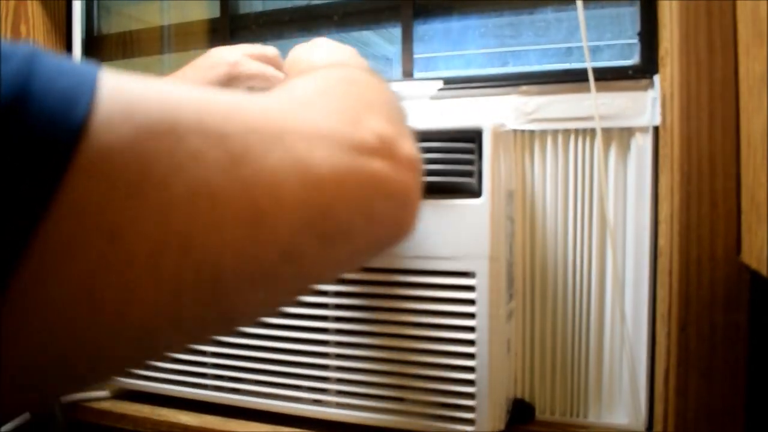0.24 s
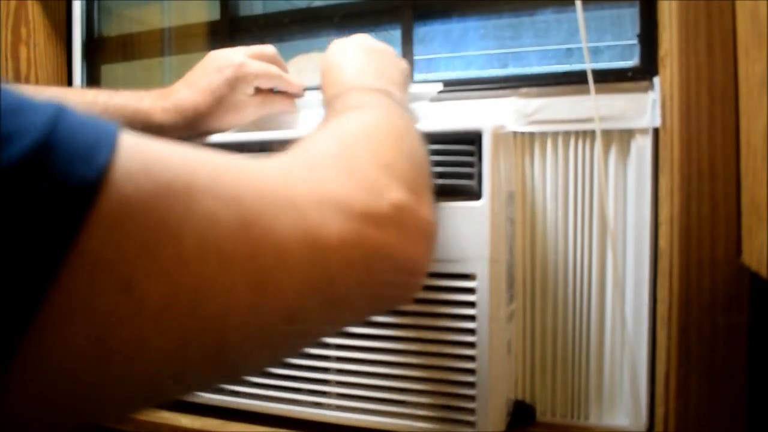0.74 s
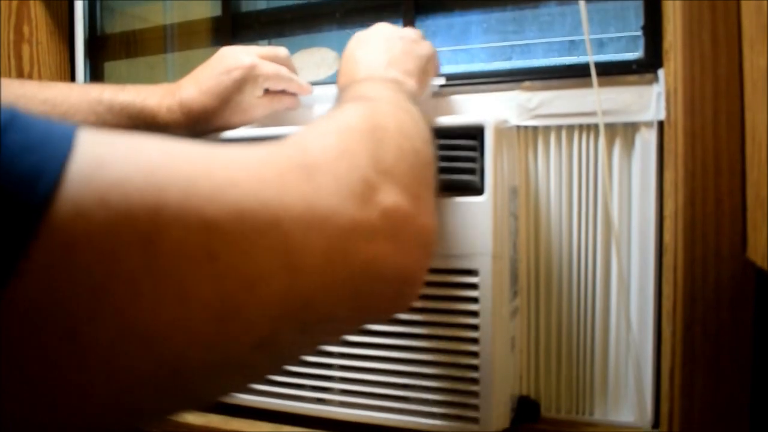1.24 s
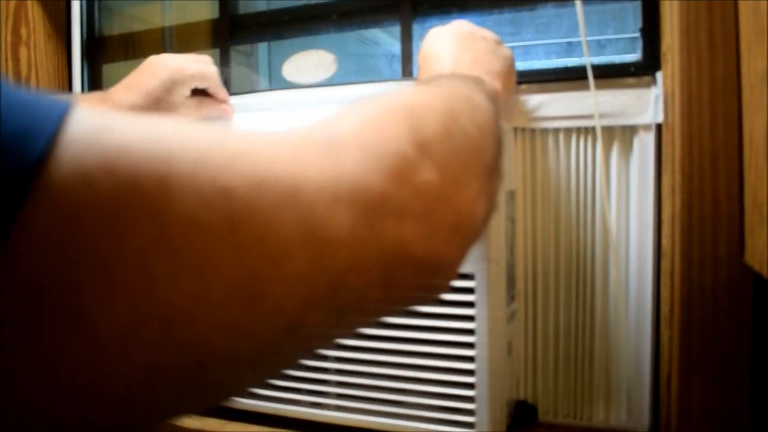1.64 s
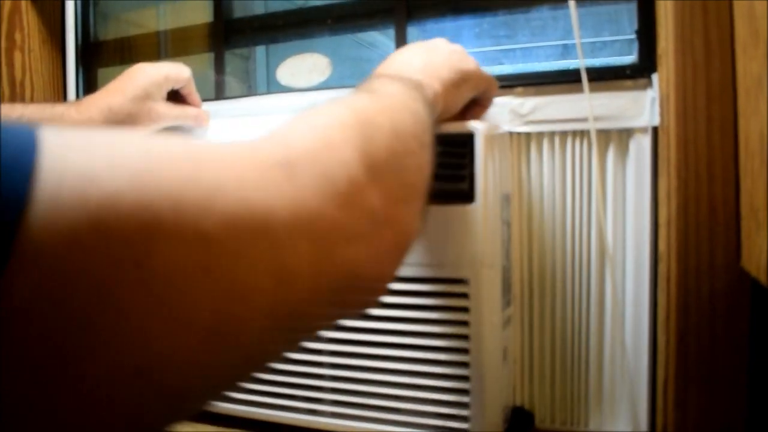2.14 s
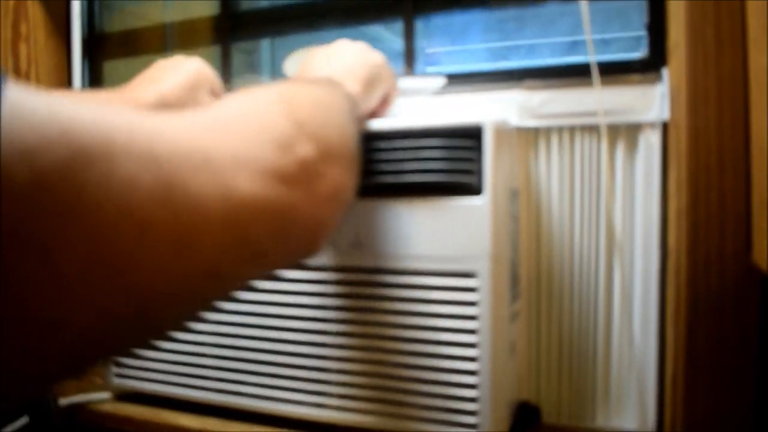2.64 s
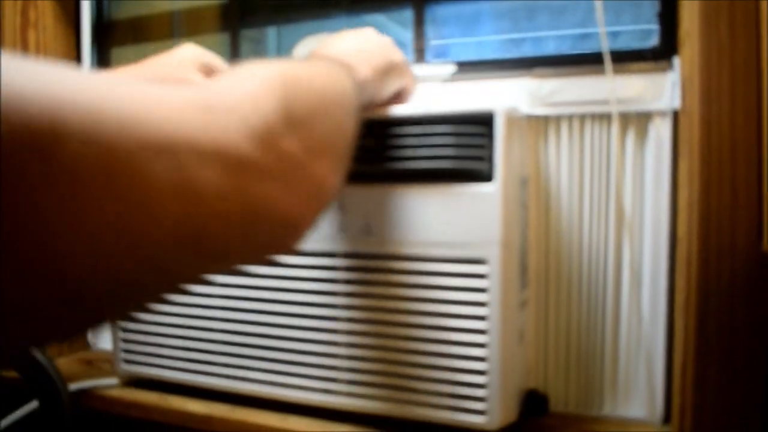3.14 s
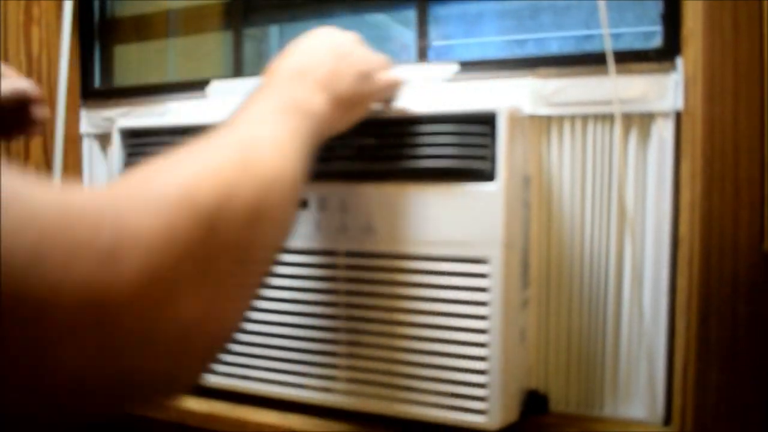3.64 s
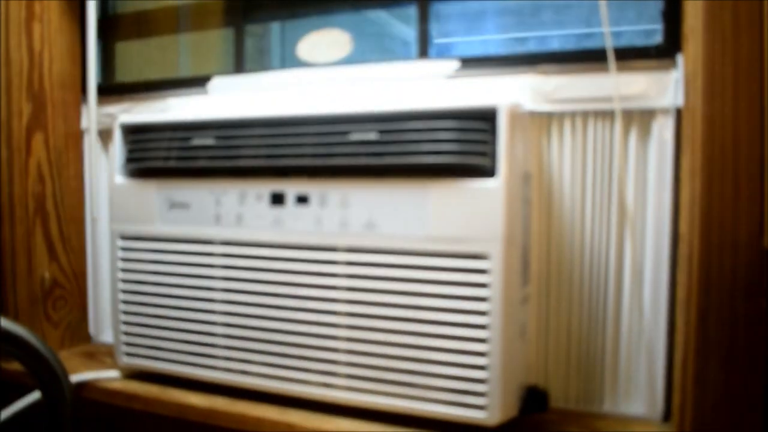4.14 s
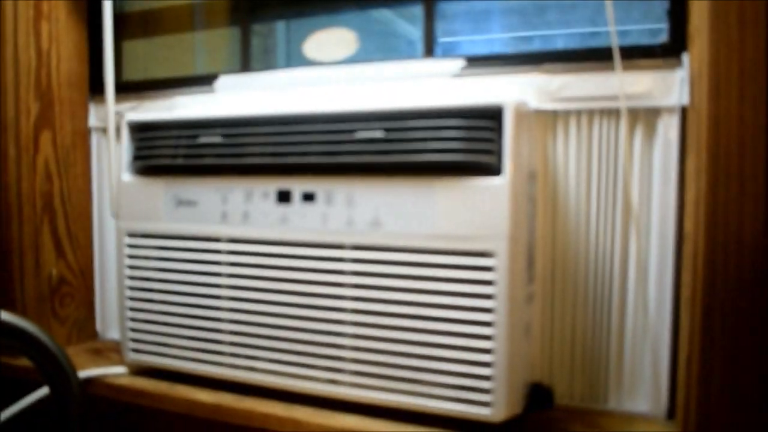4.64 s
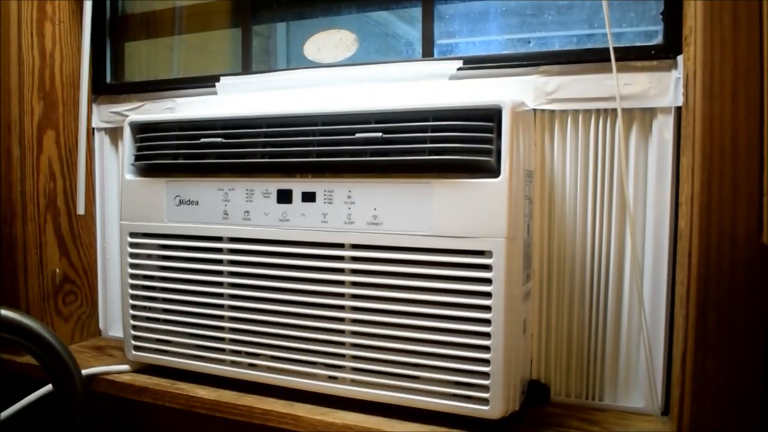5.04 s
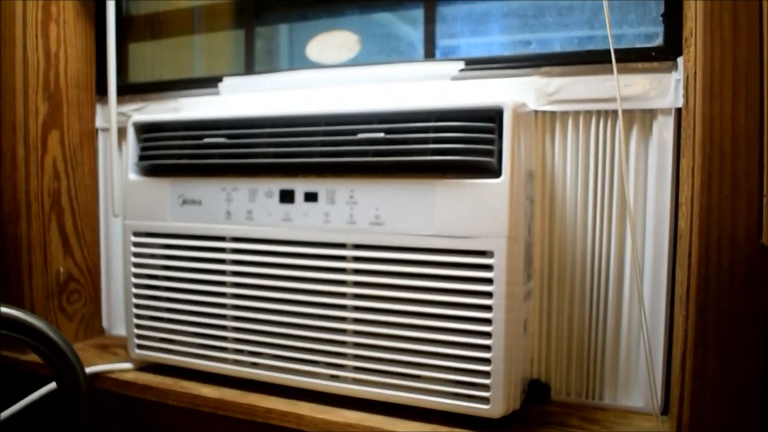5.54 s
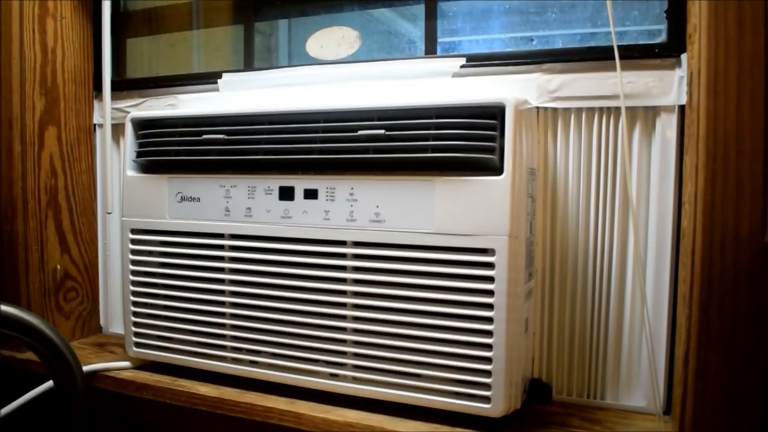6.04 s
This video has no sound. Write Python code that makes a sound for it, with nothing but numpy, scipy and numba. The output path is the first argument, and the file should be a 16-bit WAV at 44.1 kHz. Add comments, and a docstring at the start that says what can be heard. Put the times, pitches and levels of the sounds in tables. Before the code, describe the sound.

Fingers smooth tape along a window air conditioner, making soft hissing rubs mixed with hollow plastic knocks and dull thuds. A few light taps ping the window frame as the handling thins out. Then come a short peel, a snap, and a loud, jerky rip of duct tape off the roll, right by the microphone and slightly overloaded. A faint appliance hum fills the small room.

```python
"""Duct tape rips off the roll, close and loud enough to overload, in a small panelled room.
The glue lets go in stick-slip jerks: bursts of snapping threads ring the roll and the taut strip,
whose pitch dives as it lengthens. Leading up to the rip, fingers rub tape down along a window air
conditioner and knock on its plastic casing; then come a short peel and a snap.
Room air and a faint appliance hum lie underneath."""
import sys
import numpy as np
from scipy import signal
from scipy.fft import rfft, irfft
from scipy.io import wavfile
from numba import njit

SR = 44100
rng = np.random.default_rng(int(sys.argv[2]) if len(sys.argv) > 2 else 0)


def wrap_up_sound(samples):
    """Save the sound to the file named by the first command line argument, as 16-bit audio."""
    columns = np.atleast_2d(samples).T
    # keep every value between -1 and 1, then stretch to whole-number steps
    tamed = np.clip(columns, -1, 1)
    steps = np.round(tamed * 32767).astype(np.int16)
    wavfile.write(sys.argv[1], SR, steps)


N = 276948
T = np.arange(N) / SR

# jerks of the glue letting go, one long free run in the middle: (time [s], length [s], level [dB])
GLUE_SLIPS = [(5.8054, 0.0007, -1.5), (5.846, 0.0024, -3), (5.891, 0.0055, -3), (5.905, 0.0022, -9),
              (5.917, 0.0041, -7), (5.9271, .174, -7), (6.117, .016, -3.5), (6.154, .015, -5),
              (6.192, 0.00606, -6.5), (6.223, 0.0182, -9), (6.25, .03, -9)]
# resonances of the roll: (frequency [Hz], width [Hz], level [dB])
ROLL_MODES = [(2000, 200, -29), (3800, 110, -10), (6560, 620, -16), (7750, 400, -8.5)]
# low modes of the fully stretched strip, the lowest a boom of the casing or wall: (frequency [Hz], width [Hz],
# level [dB])
TWANG_MODES = [(136, 22, -4.5), (202, 41, -5), (250, 39, 2.5), (294, 23, 0.5)]
# fingers smoothing the tape: (time [s], length [s], hiss [dB], hollow casing tone [dB], sheen [dB])
FINGER_STROKES = [(0.2, .02, -34.5, -43, -68), (0.354, 0.018, -40.5, -63, -71),
                  (0.434, 0.04, -47.5, -52, -72), (0.657, 0.29, -47, -65, -65),
                  (1.093, 0.022, -46, -53, -53), (1.154, 0.031, -46, -43, -68),
                  (1.375, 0.28, -44, -48.5, -54), (1.818, .09, -53.5, -58, -64),
                  (1.965, 0.014, -56, -39.5, -72), (2.566, 0.074, -52.5, -48.5, -56.5),
                  (2.646, 0.09, -48, -41.5, -48.5), (2.748, .08, -55, -47, -64),
                  (3.245, .14, -51, -41, -59.5), (4.08, 0.24, -74, -51.5, -85),
                  (5.778, 0.035, -54, -43, -73)]
# fingers and knuckles on the casing; the sharp clacks with little thud are the sash shifting against it: (time
# [s], clack [dB], weight [dB], hardness [dB])
CASING_KNOCKS = [(0.519, -41.5, 7, 2), (0.603, -26.5, -21, -6.5), (0.679, -20, -15, -8),
                 (0.699, -38.5, 2.5, 8), (0.728, -21.5, -28, -10), (0.83, -24.5, -39, -21),
                 (0.895, -21, -38, -14), (1.114, -37.5, -16, -1), (1.335, -21.5, -5.5, -10),
                 (1.372, -33.5, 1, -10), (1.633, -34, -6.5, -8.5), (1.97, -26, -2.5, -13),
                 (2.19, -44, -17, 6), (2.417, -42, 8, -9.5), (2.449, -35, -7, -17), (2.509, -45, -2, -1),
                 (2.555, -42, -6, -10), (3.102, -38, 1, -10), (3.131, -26.5, 2, -9.5),
                 (3.186, -39.5, 2, -3), (4.372, -58.5, 20, -10), (4.494, -59, 15, -3)]
# light taps on the window frame: (time [s], level [dB], brightness [dB/octave])
FRAME_TAPS = [(3.455, -40.5, -9), (3.9927, -31, 4), (4.322, -34.5, -1), (4.602, -38, -8.5),
              (4.84, -44, -11)]

# modes of the struck parts: (frequency [Hz], level [dB], t60 [s])
PANEL_MODES = [(445, -1, 0.02), (488, 6, 0.032), (601, 4, 0.068), (680, 8.5, 0.015), (795, 13, 0.01),
               (890, 17, 0.011), (1032, -10.5, 0.12), (1186, 5.5, 0.026), (1347, -1, 0.041),
               (1560, -4, 0.013)]   # plastic casing
SASH_MODES = [(125, -19, .11), (160.5, -7, 0.19), (175, -4.5, 0.12), (219, -5, 0.12), (269, -3, 0.073),
              (309, -2, 0.06), (368, -2, 0.066)]   # window sash
FRAME_MODES = [(1290, -43, 0.71), (1393, -44, 0.9), (1580, -51, 0.36), (1960, -38, 0.72), (2140, -41, 0.34),
               (4630, -49, 0.64), (4710, -48, 0.68), (4760, -48, 0.63)]   # long ring of the frame
TAP_MODES = [(1576, -11, 0.049), (1987, -2.5, 0.045), (2120, -6.5, 0.042), (2395, -5, 0.026),
             (3070, -7, 0.013), (3550, -2.5, 0.032), (4230, -6.5, 0.02), (4570, -9, 0.012)]   # short ping of the frame

# EQ curves of the textures: (frequency [Hz], relative level [dB])
RIP_EQ = [(100, 5.5), (300, 0.5), (800, 1), (1800, 4.5), (4000, 6.5), (7000, 2), (10500, 2.5), (13000, -6),
          (16000, -10)]   # full-range tearing glue
PEEL_EQ = [(200, -6), (800, 5), (2000, -1.5), (4000, 0), (8000, 0.5), (11000, -1), (16000, -12)]   # slowly parting glue
SNAP_EQ = [(200, -13), (600, -9.5), (1200, -8), (2200, 1.5), (4000, -4.5), (7000, -10.5), (12000, -20.5),
           (16000, -19)]   # crack of the lifted end
HOLLOW_EQ = [(200, -14.5), (500, -10), (680, -0.5), (820, -0.5), (1060, -4), (1380, -12.5), (2200, -18),
             (4000, -29), (9000, -34.5)]   # boxy rubbed casing
HISS_EQ = [(200, 3), (450, 8.5), (900, 1), (2000, -0.5), (4000, -2), (6000, -4.5), (10000, -10),
           (13000, -20.5), (16000, -26)]   # skin on tape
SKID_EQ = [(500, -32), (1800, -16), (3000, -7), (4200, 3.5), (6800, -4.5), (9000, -14.5), (15000, -30)]   # thin fingernail scrape
TICK_EQ = [(700, -18), (1400, 1.5), (2100, 4.5), (3000, -4), (4200, -2), (6000, -21), (12000, -22)]   # hard plastic
CRACKLE_EQ = [(2500, -31), (5500, 14), (8000, 9.5), (11000, 2.5), (16000, -39)]   # crisp crushed tape
AIR_EQ = [(15, -63), (25, -10), (59, -5.5), (123, -14.5), (144, -18.5), (179, -16.5), (333, -17.5),
          (403, -23.5), (449, -22.5), (812, -26), (1360, -30), (2030, -32.5), (2260, -35), (3490, -38),
          (15800, -49)]   # dark room tone

# partials of the appliance hum: (frequency [Hz], rms level [dB])
HUM_PARTIALS = [(55.5, -49), (115, -54), (176.8, -52.5)]

# pitch dive of the growing strip: (time [s], first pitch [Hz], last pitch [Hz], fall [octaves/s])
RIP_DIVE = (5.968, 810, 246, 24.7)
PEEL_DIVE = (5.382, 8400, 970, 55)


def rip():
    """Each slip is an avalanche of snapping glue threads that rings the roll and the strip."""
    loose_s, loosen_s, thin_db, full_db = 5.93, 0.053, -26, 5
    slipping = sum(amp(db) * gesture(s, length, release_s=0.006) for s, length, db in GLUE_SLIPS)
    # a few threads go on parting after each slip
    creeping = sum(amp(db - 18) * gesture(s, length, release_s=0.1) for s, length, db in GLUE_SLIPS)
    threads = grains(18000, spread_db=1.5) * amp(2 * drift(450) + 1.13 * drift(90))
    snaps = colour(slipping * threads + creeping * grains(1500, spread_db=7), RIP_EQ)
    roll = resonances(snaps, ROLL_MODES)
    # thin until the tape comes loose, then the body fills in
    thin = signal.sosfilt(signal.butter(1, 3000, "high", fs=SR, output="sos"), snaps)
    body = amp(np.interp(T, [loose_s - loosen_s, loose_s], [thin_db, full_db])) * (snaps - thin)
    return amp(-2.5) * strip(thin + body + roll, RIP_DIVE, damping=0.3, leak_db=-14)


def strip(snaps, dive, damping, leak_db):
    """Snaps drive the taut strip, which drops in pitch as it grows; a little leaks out via the roll."""
    start, first_hz, last_hz, octaves_per_s = dive
    falling_hz = first_hz * 2 ** (-octaves_per_s * np.maximum(T - start, 0))
    return membrane(snaps, np.maximum(falling_hz, last_hz), damping) + amp(leak_db) * snaps


@njit
def membrane(x, hz, damping):
    """Swept resonant high-pass: a strip radiates little below its lowest mode."""
    out, band, low = np.zeros(len(x)), 0.0, 0.0
    for i in range(len(x)):
        g = np.tan(np.pi * hz[i] / SR)
        high = (x[i] - (damping + g) * band - low) / (1 + g * (damping + g))
        low += 2 * g * (g * high + band)
        band += 2 * g * high
        out[i] = high
    return out


def twang():
    """At full length, the strip is jerked taut whenever the glue snags or grips again."""
    snags_per_s = 110
    start, first_hz, last_hz, octaves_per_s = RIP_DIVE
    stretched = T > start + np.log2(first_hz / last_hz) / octaves_per_s
    slipping = sum((T >= s) & (T < s + length) for s, length, _ in GLUE_SLIPS)
    snags = slipping * (rng.random(N) < snags_per_s / SR)
    grips = clicks_at([s + length for s, length, _ in GLUE_SLIPS], 1) + amp(-4) * snags
    return amp(32.5) * resonances(grips * stretched, TWANG_MODES)


def peel():
    """Glue threads part one by one in a short crescendo as the end of the tape is lifted."""
    pull = gesture(start=5.369, length=0.093, attack_s=0.0018, release_s=0.075, slope_db_per_s=128)
    threads = colour(amp(-37) * pull * grains(5000, spread_db=3), PEEL_EQ)
    return strip(threads, PEEL_DIVE, damping=0.93, leak_db=-30)


def snap():
    """The lifted end snaps taut with one sharp crack."""
    return colour(grains(20000, spread_db=5.5) * bursts([5.6103], db=-14, t60=0.02), SNAP_EQ)


def rubbing():
    """Skin catches on the weave of the tape: grainy hiss, a high sheen, the hollow casing below."""
    # a light brushing goes on between strokes until the hands leave
    brushing = amp(2.5 * drift(12)) * (T < 3.58)
    hollow_power, hiss_power, sheen_power = (amp(-62.5) * brushing) ** 2, (amp(-63) * brushing) ** 2, 0
    for s, length, hiss_db, hollow_db, sheen_db in FINGER_STROKES:
        pressure = gesture(s, length, attack_s=0.25 * length, release_s=0.08 + 0.61 * length)
        hollow_power += (amp(hollow_db) * pressure) ** 2
        hiss_power += (amp(hiss_db) * pressure) ** 2
        sheen_power += (amp(sheen_db) * pressure) ** 2
    catching = amp(0.99 * drift(70))
    hollow = colour(np.sqrt(hollow_power) * catching * grains(4000, spread_db=1.5), HOLLOW_EQ)
    hiss = colour(np.sqrt(hiss_power) * catching * grains(9000, spread_db=2.5), HISS_EQ)
    high_noise = rms_one(bandpass(rng.standard_normal(N), hz=9900, width_hz=4000))
    sheen = np.sqrt(sheen_power) * catching * high_noise
    return amp(0.5) * (hollow + hiss) + sheen


def nail_skid():
    """A fingernail skids over the tape backing: it bites at once and fades as it slows."""
    bite = gesture(start=0.1117, length=0.068, attack_s=0.0045, release_s=0.14, slope_db_per_s=-85)
    return colour(amp(-30.5) * bite * grains(8000, spread_db=3.5), SKID_EQ)


def knocks():
    """A knock makes the panel clack, the sash thud, the plastic tick and the tape crackle."""
    times, clack_db, weight_db, hardness_db = np.transpose(CASING_KNOCKS)
    thud_db, tick_db = clack_db + weight_db, clack_db + hardness_db
    crackle_db = tick_db + 0.45 * weight_db   # a heavier touch crushes the tape more
    clack = struck(times, clack_db, PANEL_MODES, contact_t60=0.028)
    thud = struck(times, thud_db, SASH_MODES, contact_t60=0.062)
    tick = colour(grains(9000, spread_db=2) * bursts(times, tick_db, t60=0.067), TICK_EQ)
    crackle = colour(grains(5000, spread_db=1.5) * bursts(times, crackle_db, t60=0.033), CRACKLE_EQ)
    return amp(-8) * clack + amp(4.5) * thud + amp(3.5) * tick + amp(-3.5) * crackle


def frame_ring():
    """The frame sings on after one hard knock."""
    knock = clicks_at(times=[0.729], sizes=1)
    return sum(amp(db) * ring(knock, hz, t60) for hz, db, t60 in FRAME_MODES)


def frame_taps():
    """Light taps ping the window frame; a harder one wakes more of the upper modes."""
    times, tap_db, db_per_octave = np.transpose(FRAME_TAPS)
    lowest_hz = TAP_MODES[0][0]
    pings = np.zeros(N)
    for hz, mode_db, t60 in TAP_MODES:
        tilt_db = db_per_octave * np.log2(hz / lowest_hz)
        taps = clicks_at(times, amp(tap_db + mode_db + tilt_db))
        pings += rng.choice([-1, 1]) * ring(taps, hz, t60)
    return pings


def room(x, near_db, near_t60, tail_t60, tail_db=-10.5):
    """Direct sound, shifting early echoes off casing and window recess, and a duller tail."""
    near_eq = [(150, 0), (700, -1.5), (16000, 2)]
    tail_eq = [(200, 3), (2000, 0), (6000, -1.5), (10000, -4.5), (16000, -26)]
    crossfade = np.cos(9 * T), np.sin(9 * T)   # two echo patterns trade places as the hands move
    near = sum(share * echoes(x, near_t60, near_eq, predelay_s=0.001) for share in crossfade)
    tail = echoes(x, tail_t60, tail_eq, predelay_s=0.0065)
    total_power = 1 + amp(near_db) ** 2 + amp(tail_db) ** 2
    return (x + amp(near_db) * near + amp(tail_db) * tail) / np.sqrt(total_power)


def appliance_hum():
    """Low partials of an appliance, each wavering a little in level and phase."""
    hum = np.zeros(N)
    for hz, db in HUM_PARTIALS:
        peak = np.sqrt(2) * amp(db + 2.86 * drift(3.774))
        hum += peak * np.sin(2 * np.pi * hz * T + 0.6 * drift(1.53))
    return hum


def room_air():
    """Still air: a soft bed of dark noise."""
    noise = colour(rng.standard_normal(N), AIR_EQ)
    return amp(-47) * rms_one(signal.sosfilt(signal.butter(1, 11000, fs=SR, output="sos"), noise))


def amp(db):
    """Decibels to gain."""
    return 10 ** (np.asarray(db) / 20)


def rms_one(x):
    """Scale to unit power."""
    return x / np.sqrt(np.mean(x ** 2) + 1e-20)


def drift(per_s):
    """Smooth random modulation of unit power, with `per_s` new values a second."""
    return rms_one(np.interp(T * per_s, np.arange(8000), rng.standard_normal(8000)))


def gesture(start, length, release_s, attack_s=1 / SR, slope_db_per_s=0):
    """Envelope of one move: a rise, a flat or sloping hold, then 60 dB down in release_s."""
    t = np.maximum(T - start, 0)
    attack = np.minimum(t / attack_s, 1)
    hold = amp(slope_db_per_s * np.minimum(t, length))
    release = amp(-60 * np.clip((t - length) / release_s, 0, 2))
    return attack * hold * release


def clicks_at(times, sizes):
    """One click of the given size at each time."""
    out = np.zeros(N)
    out[np.minimum(np.round(np.asarray(times) * SR).astype(int), N - 1)] = sizes
    return out


def bursts(times, db, t60):
    """Percussive envelope: an instant attack and an exponential decay at each time."""
    return signal.lfilter([1], [1, -amp(-60 / (t60 * SR))], clicks_at(times, amp(db)) + 1e-18)


def grains(per_s, spread_db):
    """Random tiny snaps of uneven size; unit power."""
    sizes = amp(spread_db * np.minimum(rng.exponential(1, N), 4)) * rng.choice([-1, 1], N)
    return rms_one(sizes * (rng.random(N) < per_s / SR))


def ring(clicks, hz, t60):
    """A unit click sets a sine of height 1 ringing."""
    r, w = amp(-60 / (t60 * SR)), 2 * np.pi * hz / SR
    return signal.lfilter([0, np.sin(w)], [1, -2 * r * np.cos(w), r * r], clicks + 1e-18)


def struck(times, db, modes, contact_t60):
    """A fleshy touch is a brief uneven push, felt differently by each mode."""
    unit_energy = np.sqrt(2 * np.log(1000) / (contact_t60 * SR))
    push = unit_energy * bursts(times, db, contact_t60)
    return sum(amp(level) * ring(push * rng.standard_normal(N), hz, t60) for hz, level, t60 in modes)


def bandpass(x, hz, width_hz):
    """One resonance with gain 1 at its centre."""
    r, w = np.exp(-np.pi * width_hz / SR), 2 * np.pi * hz / SR
    return (1 - r * r) / 2 * signal.lfilter([1, 0, -1], [1, -2 * r * np.cos(w), r * r], x + 1e-18)


def resonances(x, modes):
    """A resonant body as a bank of parallel band-passes."""
    return sum(amp(db) * bandpass(x, hz, width_hz) for hz, width_hz, db in modes)


def colour(x, eq):
    """Minimum-phase EQ with unit power gain: no pre-ring ahead of the attacks."""
    size = 4096
    hz, db = np.transpose(eq)
    grid_hz = np.maximum(np.arange(size // 2 + 1) * SR / size, 1)
    gains = rms_one(amp(np.interp(np.log(grid_hz), np.log(hz), db)))
    cepstrum = irfft(np.log(gains))
    cepstrum[1:size // 2] *= 2   # fold onto positive time
    cepstrum[size // 2 + 1:] = 0
    impulse = irfft(np.exp(rfft(cepstrum)))
    return signal.fftconvolve(x, impulse)[:len(x)]


def echoes(x, t60, eq, predelay_s):
    """The sound through a dense, decaying train of reflections of unit energy."""
    t = T[:SR // 2]
    train = colour(rng.standard_normal(len(t)) * amp(-60 * t / t60) * (t > predelay_s), eq)
    return signal.fftconvolve(x, train / np.linalg.norm(train))[:N]


def scene():
    """Mono mix: the roll up close, hands on the casing at arm's length, hum and air behind."""
    tape = rip() + peel() + snap()
    hands = rubbing() + nail_skid() + knocks() + frame_ring() + frame_taps()
    tape = room(tape, near_db=-2.5, near_t60=0.067, tail_t60=0.4)
    hands = room(hands, near_db=-6, near_t60=0.024, tail_t60=0.41)
    return (tape + twang() + hands + appliance_hum() + room_air())[None]


def record(dry):
    """Hard clipping on the loudest peaks, then a rumble filter and a steep top cut."""
    clipped = np.clip(dry, -0.93, 0.93)
    lean = signal.sosfilt(signal.butter(2, 38, "high", fs=SR, output="sos"), clipped)
    return signal.sosfilt(signal.ellip(12, 0.1, 80, 15900, fs=SR, output="sos"), lean)


dry = scene()
out = record(dry)
wrap_up_sound(out)
```